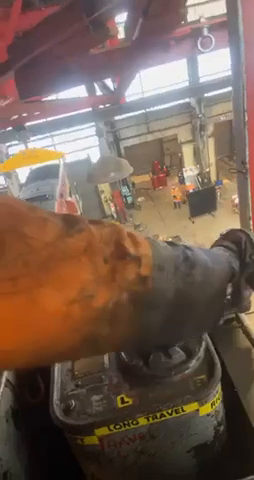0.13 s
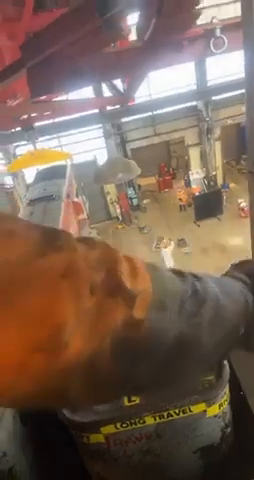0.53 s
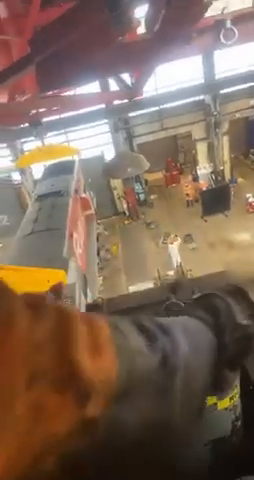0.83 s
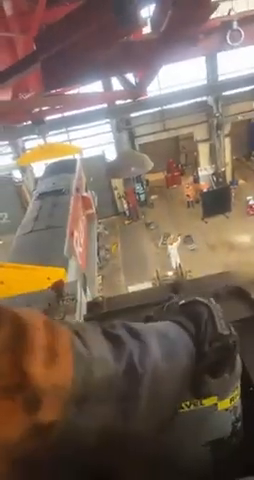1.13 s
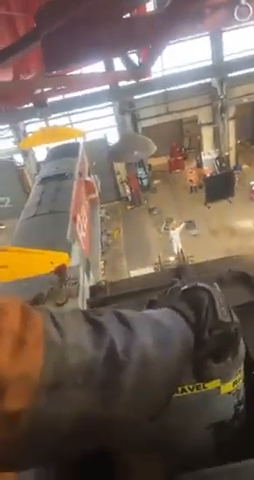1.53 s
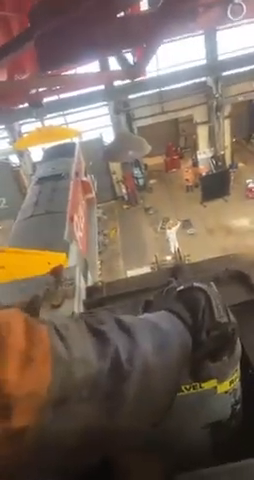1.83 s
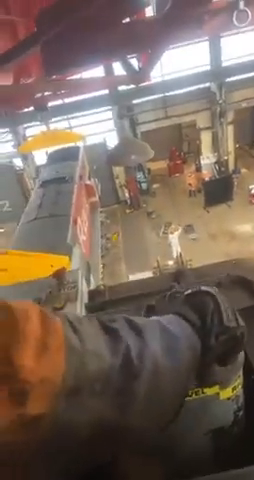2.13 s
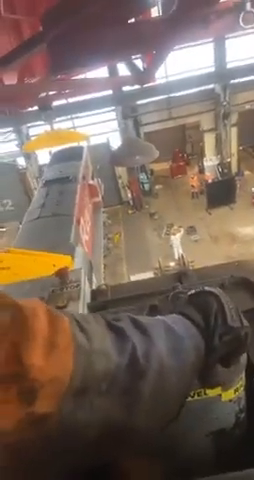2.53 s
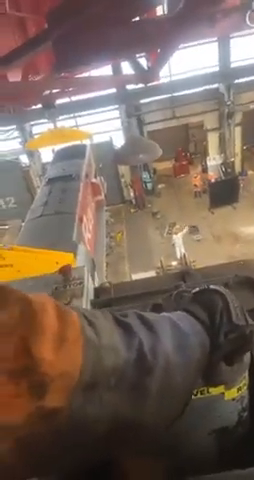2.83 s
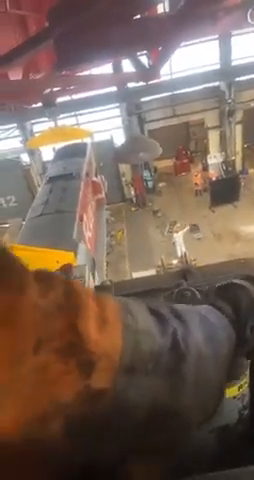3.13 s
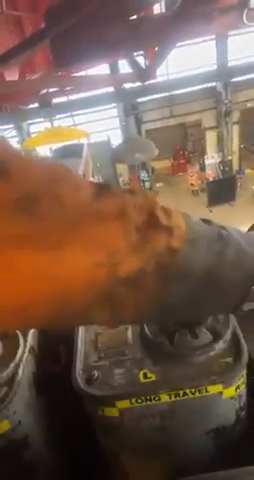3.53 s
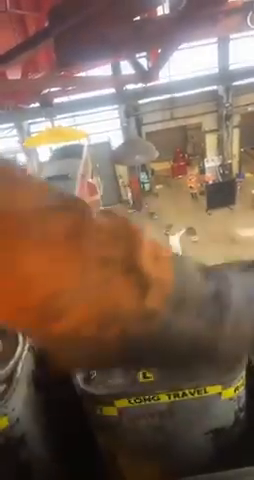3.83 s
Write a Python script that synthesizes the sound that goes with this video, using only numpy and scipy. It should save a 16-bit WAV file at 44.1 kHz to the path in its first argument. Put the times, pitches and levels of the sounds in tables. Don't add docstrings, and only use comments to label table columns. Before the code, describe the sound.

Heavy crane rolling rumble fades, with sharp controller clacks, a panel judder and one very loud clunk

```python
import sys
import numpy as np
from scipy import signal
from scipy.fft import rfft, irfft, next_fast_len
from scipy.io import wavfile
from scipy.ndimage import uniform_filter1d, map_coordinates

SR = 44100
rng = np.random.default_rng(int(sys.argv[2]) if len(sys.argv) > 2 else 0)


def volts_from_decibels(level):
    exponent = np.asarray(level, float) / 20
    return 10 ** exponent


def dump_mix(stems):
    frames = np.atleast_2d(stems).T
    limited = np.clip(frames, -1, 1)
    pcm = np.round(limited * 32767).astype(np.int16)
    wavfile.write(sys.argv[1], SR, pcm)


N = 176400
T = np.arange(N) / SR

# frequency in Hz, level in dB per Hz.
FRICTION = [(350, -16.5), (600, -5.5), (746, -10), (1170, -19.5), (1280, -15.5), (2520, -21.5),
            (6600, -20.5), (8890, -29), (9310, -73), (12100, -79.5), (20500, -120)]


def unit(x):
    return x / np.sqrt(np.mean(x ** 2) + 1e-20)


def along(points, hz):
    f, v = np.transpose(points)
    return np.interp(np.log(hz + 1), np.log(f + 1), v)


def curves(rows):
    s, *cols = np.transpose(rows)
    return [np.interp(T, s, c) for c in cols]


def wobble(rate_hz):
    return map_coordinates(rng.standard_normal(8000), [T * rate_hz])


def sine(hz):
    return np.sin(2 * np.pi * np.cumsum(hz) / SR)


def filtered(x, response):
    m = next_fast_len(N + SR // 2)
    return irfft(rfft(x, m) * response(np.fft.rfftfreq(m, 1 / SR)), m)[..., :N]


def rush(spectrum, patchy_db=1):
    z = signal.stft(rng.standard_normal(N), nperseg=512)[2]
    field = uniform_filter1d(rng.standard_normal(z.shape), size=8, axis=0)
    field = uniform_filter1d(field, size=5, axis=1)
    x = signal.istft(z * volts_from_decibels(patchy_db * unit(field)), nperseg=512)[1][:N]
    return unit(filtered(x, lambda hz: volts_from_decibels(along(spectrum, hz))))


def ring(modes, t):
    out = np.zeros(len(t))
    for hz, db, t60 in modes:
        level, detune = rng.standard_normal(2)
        decay = volts_from_decibels(db + 2 * level - 60 * t / t60)
        out += decay * np.sin(2 * np.pi * hz * (1 + detune / 300) * t)
    return out


def add(out, s, sound):
    out[round(s * SR):][:len(sound)] += sound


def floor():
    # frequency in Hz, level in dB per Hz.
    floor_spectrum = [(18, -39.5), (30, -10.5), (76, 1.5), (212, -16.5), (251, -17), (414, -13.5),
                      (2150, -44), (6920, -47.5), (9000, -53), (11700, -81.5), (19800, -120)]
    return volts_from_decibels(-39.5) * rush(floor_spectrum)


def travel():
    # time in seconds, level in dB.
    strength = [(0.0, -19), (.05, -20.5), (.35, -20.5), (0.62, -19), (1.0, -21), (1.3, -25), (1.6, -28.5),
                (1.85, -30.5), (2.2, -33), (2.6, -36), (2.92, -37), (3.11, -35.5), (3.4, -33), (3.52, -30),
                (3.65, -29), (3.85, -29), (4.0, -21.5)]
    # frequency in Hz, width in Hz, level in dB.
    girder_modes = [(58, 19, 2), (103, 58, 0), (200.6, 51.4, -1), (265, 74, -7), (449.4, 43, -16.5)]
    # centre in seconds, half length in seconds, extra level in dB.
    jolts = [(0.177, .04, 0), (0.616, 0.022, 0), (0.743, .04, 3), (0.863, 0.011, 4), (0.983, 0.03, 5),
             (1.189, 0.073, 3.5), (1.426, 0.019, 2.5), (1.67, 0.046, 5.5), (1.951, 0.073, 7),
             (2.058, 0.024, -3), (2.287, 0.044, 5.5), (2.443, .04, 6.5), (2.738, 0.047, 3.5),
             (3.21, 0.047, 6.5), (3.503, 0.027, 7.5), (3.607, 0.034, 5.5), (3.953, .03, -0.5)]
    # frequency in Hz, level in dB per Hz.
    roar_spectrum = [(15, -47.5), (25, -5.5), (81, -3.5), (200, -5.5), (401, -16.5), (441, -16),
                     (535, -21.5), (636, -23.5), (2500, -52), (3250, -64.5), (5500, -120)]
    # frequency in Hz, level in dB per Hz.
    hiss_spectrum = [(590, -33.5), (1000, -5), (1870, -6), (2210, -7), (2500, -10.5), (3560, -9.5),
                     (7440, -17.5), (8970, -21), (9310, -68.5), (12100, -67), (20500, -120)]
    girder_db, lumps_db, roar_db, hiss_db = -3, 2.5, -1.5, -24.5

    def steel(f):
        total = 0
        for k, (centre, width, db) in enumerate(girder_modes):
            mode = 1j * f * width / (centre * centre - f * f + 1j * f * width)
            total = total + (-1) ** k * volts_from_decibels(db) * mode ** 2
        return total

    strength_db, = curves(strength)
    jolt_db = sum(db * np.exp(-((T - s) / half) ** 2) for s, half, db in jolts)
    shaking = volts_from_decibels(lumps_db * wobble(14)) * rng.standard_normal(N)
    girder = volts_from_decibels(girder_db + jolt_db) * unit(filtered(shaking, steel))
    roar = volts_from_decibels(roar_db + 0.57 * jolt_db + 0.6 * wobble(8.03)) * rush(roar_spectrum, patchy_db=1.5)
    hiss = volts_from_decibels(hiss_db + 0.37 * wobble(9.9)) * rush(hiss_spectrum)
    return volts_from_decibels(strength_db) * (girder + roar + hiss)


def gear():
    # time in seconds, hum in Hz, level in dB.
    hum = [(0, 189, -52), (.035, 198.1, -12), (.15, 196.6, -11.5), (.19, 198, -20), (.24, 184, -19.5),
           (.32, 196.8, -17), (.42, 212.6, -15), (.5, 193.9, -12), (.56, 197.7, -17.5), (.6, 202.4, -23.5),
           (.64, 209.4, -16), (.68, 184.2, -20.5), (.73, 199.6, -14.5), (.8, 182, -18.5), (.9, 200, -25.5),
           (.99, 202.6, -19), (1.06, 196, -29.5), (1.6, 199.4, -57.5)]
    hum_hz, hum_db = curves(hum)
    return volts_from_decibels(hum_db - 3.5 + wobble(30)) * sine(hum_hz + 4 * wobble(15))


def scrapes():
    # centre in seconds, half length in seconds, level in dB.
    strokes = [(0.132, 0.081, -42), (0.243, 0.026, -40.5), (0.4, 0.028, -41), (0.506, 0.044, -35),
               (0.694, 0.063, -41), (0.817, 0.075, -43), (0.98, 0.023, -45.5), (1.117, 0.026, -44),
               (1.147, 0.1, -49), (1.292, 0.039, -47.5), (1.474, 0.063, -48.5), (1.721, 0.083, -48.5),
               (2.043, 0.036, -50), (3.281, 0.038, -31.5), (3.334, 0.018, -42.5), (3.623, 0.073, -45),
               (3.787, 0.027, -34), (3.868, 0.042, -51)]
    grain_db = 2.5
    swell = sum(volts_from_decibels(db) * np.exp(-np.abs((T - s) / half) ** 3) for s, half, db in strokes)
    return swell * unit(volts_from_decibels(grain_db * wobble(250)) * rush(FRICTION))


def rubs():
    # centre in seconds, half length in seconds, resonance in Hz, width in Hz, level in dB.
    swells = [(0.35, 0.023, 200, 26, -21.5), (0.37, 0.08, 283, 26, -27.5), (0.688, 0.023, 2095, 300, -39),
              (0.922, 0.012, 7560, 500, -38), (.935, 0.0074, 1650, 180, -35),
              (1.108, 0.02, 1400, 2800, -36), (3.37, 0.052, 865, 25, -46.5),
              (3.545, 0.024, 400, 100, -31.5), (3.95, .04, 450, 110, -33.5), (.1, 0.047, 268, 40, -28),
              (0.5, 0.036, 200, 44, -24), (3.57, 0.009, 1370, 60, -43), (3.595, 0.013, 250, 42, -27),
              (0.82, 0.066, 245, 30, -31), (1.24, 0.036, 250, 83, -25.5), (.8, 0.067, 78, 96, -27.5),
              (1.5, 0.015, 205, 96, -25), (1.989, 0.099, 120, 100, -30.5), (2.28, 0.04, 206, 28, -25.5),
              (3.945, 0.03, 4050, 2200, -42.5), (3.272, 0.033, 1820, 820, -34.5),
              (3.295, 0.064, 371, 30, -32.5), (3.537, 0.014, 2570, 900, -42),
              (3.94, 0.044, 1640, 1300, -39.5), (3.549, 0.032, 249, 80, -21.5),
              (3.949, 0.081, 229, 185, -24.5), (1.8, 0.47, 445, 17, -46)]
    out, t = np.zeros(N + SR), np.arange(SR) / SR - 1 / 2
    f = np.fft.rfftfreq(len(t), 1 / SR)
    for s, half, hz, width, db in swells:
        resonance = np.exp(-((f - hz) / width) ** 2)
        band = irfft(rfft(rng.standard_normal(len(t))) * resonance, len(t))
        add(out, s, volts_from_decibels(db) * np.exp(-(t / half) ** 2) * unit(band))
    return out[SR // 2:][:N]


def cab():
    # start in seconds, level in dB.
    thuds = [
        (0.33, -26),
        (3.469, -25.5),
        (3.709, 2),
        (3.76, -5.5),
        (3.785, -10),
        (3.803, -14),
        (3.866, -16),
    ]
    # frequency in Hz, level in dB, t60 in seconds.
    wall_modes = [(248, 0, .085), (285, -19, .15), (365, -17, .1), (455, -22, .08), (608, -26, .1),
                  (790, -29, .06)]
    # start in seconds, frequency in Hz, level in dB, t60 in seconds.
    pings = [
        (0.613, 1746, -31, 0.065),
        (2.24, 2270, -56, 0.12),
        (2.291, 1500, -56, 0.043),
        (3.04, 1315, -61.5, 0.65),
        (3.197, 1910, -51, 0.042),
        (3.242, 3080, -39.5, 0.037),
        (3.419, 1785, -49.5, 0.08),
        (3.635, 2170, -37.5, 0.025),
        (3.733, 970, -30, 0.084),
        (0.331, 5410, -21.5, 0.025),
    ]
    boom_rise_s, spread = .007, .06
    out, t = np.zeros(N + SR), np.arange(SR // 2) / SR
    for s, db in thuds:
        add(out, s, volts_from_decibels(db) * (1 - np.exp(-t / boom_rise_s)) * ring(wall_modes, t))
    for s, hz, db, t60 in pings:
        close = [(hz * (1 + spread * k), 0, t60) for k in (-1, -1 / 3, 1 / 2, 1)]
        add(out, s, volts_from_decibels(db + 5) * (1 - np.exp(-t * 20 / t60)) * ring(close, t))
    return out[:N]


def controller():
    # start in seconds, crack in dB, knock in dB, hold in seconds, t60 in seconds.
    notches = [
        (0.331, -19, -23, 0.0038, 0.081),
        (.343, -31, -31, 0.0026, .07),
        (0.422, -27.5, -36, .025, 0.085),
        (.611, -55, -32, 0.018, 0.1),
        (0.923, -30.5, -36, 0.01406, 0.13),
        (3.236, -51, -43, 0.02, 0.093),
        (3.52, -54, -38, 0.01, .1),
        (3.532, -51, -34.5, 0.018, 0.1),
        (3.7069, -13, -21, 0.0046, 0.072),
        (3.728, -42, -35, 0.0068, .08),
    ]
    # frequency in Hz, level in dB per Hz.
    crack_spectrum = [(410, -35), (700, -11.5), (1610, -2.5), (2300, -21.5), (2770, -10.5), (3220, -8),
                      (4510, -7.5), (7030, -12), (9310, -22), (12100, -56.5), (20500, -120)]
    # frequency in Hz, level in dB per Hz.
    knock_spectrum = [(700, -39), (1000, -13.5), (1400, -1.5), (1650, 0.5), (1950, -18), (2300, -49.5)]
    # frequency in Hz, level in dB, t60 in seconds.
    case_modes = [(946, -12, .3), (1004, -12, .27), (1135, -3, .07), (1370, -3, .12), (1497, -12, .08),
                  (1588, 0, .05), (1680, -3, .045), (1857, -10, .1)]
    rise_s, sag_db_per_s, ring_db = 0.00069, 210, -3.5
    out, t = np.zeros(N + SR), np.arange(SR // 2) / SR
    crack = np.pad(rush(crack_spectrum), (0, SR))
    knock = np.pad(rush(knock_spectrum), (0, SR))
    rise = 1 - np.exp(-t / rise_s)
    for s, crack_db, knock_db, hold, t60 in notches:
        here = slice(round(s * SR), round(s * SR) + len(t))
        shape = volts_from_decibels(-sag_db_per_s * np.minimum(t, hold) - 60 * np.clip(t - hold, 0, None) / t60)
        impact = shape * (volts_from_decibels(crack_db) * crack[here] + volts_from_decibels(knock_db) * knock[here])
        case = volts_from_decibels(knock_db + ring_db) * ring(case_modes, t)
        add(out, s, rise * (impact + case))
    return out[:N]


def judder():
    # time in seconds, shaking in Hz, level in dB.
    shaking = [(3.175, 282.4, -44), (3.197, 288.8, -34), (3.232, 304, -28), (3.246, 296.5, -30.5),
               (3.264, 289, -16), (3.285, 287, -13.5), (3.312, 291.6, -15), (3.322, 298, -22),
               (3.34, 286.6, -21.5), (3.35, 295, -31.5), (3.375, 290, -26.5), (3.394, 293, -32.5),
               (3.42, 296, -50)]
    # multiple of the shaking rate, level in dB.
    orders = [(1, 0), (2, -14), (3, -20), (4, -23), (5, -34), (6, -34)]
    lead_s, overtone_grows, rattle_db, rattle_sharp = .005, .35, -28, 0.87
    hz, db = curves(shaking)
    phase = 2 * np.pi * np.cumsum(hz + 2 * wobble(40)) / SR
    fade = np.clip(np.minimum(T - shaking[0][0], shaking[-1][0] - T) / 0.016, 0, 1)
    tone = np.zeros(N)
    for k, level in orders:
        early_db = np.interp(T + lead_s * (k - 1), T, db)
        growth_db = overtone_grows * np.sqrt(k - 1) * (early_db - db.max())
        order_db = level + 4 + early_db + growth_db + np.sqrt(k) * wobble(50)
        tone += volts_from_decibels(order_db) * np.cos(k * phase)
    contact = ((1 - np.cos(phase)) / 2) ** rattle_sharp
    rattle = unit(contact * rush(FRICTION))
    return fade * (tone + volts_from_decibels(db + rattle_db) * rattle)


def squeal():
    start_s, pitch_hz, level_db, rise_s = 3.989, 7450, -29, .009
    rise = 1 / (1 + np.exp(np.clip((start_s - T) * 4 / rise_s, -50, 50)))
    return rise * volts_from_decibels(level_db + 1.2 * wobble(150)) * sine(pitch_hz + 15 * wobble(100))


def hall(x):
    # frequency in Hz, t60 in seconds.
    decay = [(200, .9), (2000, 0.27), (9000, 0.077)]
    hz, t, z = signal.stft(rng.standard_normal(SR), SR, nperseg=256)
    tail = signal.istft(z * volts_from_decibels(-60 * t / along(decay, hz)[:, None]), SR, nperseg=256)[1]
    delayed = np.pad(x, (600, 0))
    return signal.fftconvolve(delayed, tail / np.linalg.norm(tail))[:N]


def scene():
    near = scrapes() + rubs() + cab() + controller()
    mix = floor() + travel() + gear() + near + volts_from_decibels(-14) * hall(near) + judder() + squeal()
    return mix[None]


def low_pass(x):
    return signal.sosfilt(signal.butter(12, 9460, fs=SR, output="sos"), x)


def record(dry):
    low_hz, top_hz, clip = 34.5, 9450, .72
    heard = filtered(dry, lambda hz: (hz < top_hz) / (1 + (low_hz / (hz + 1)) ** 6))
    heard = heard / (1 + abs(heard / clip) ** 4) ** (1 / 4)
    return low_pass(heard)


dry = scene()
out = record(dry)
dump_mix(out)
```